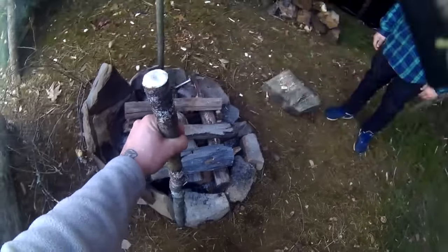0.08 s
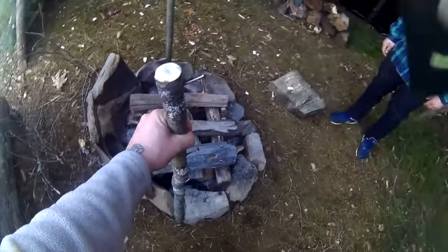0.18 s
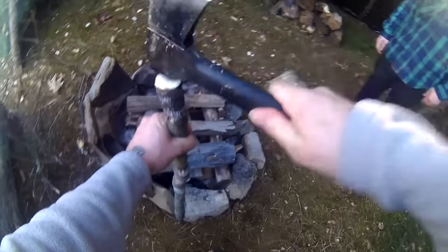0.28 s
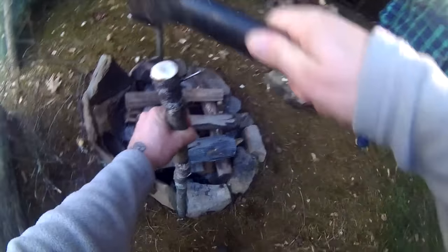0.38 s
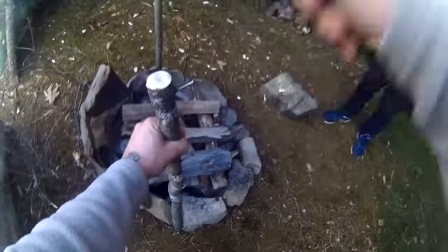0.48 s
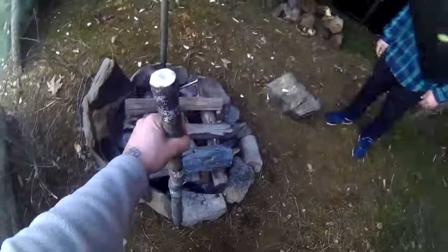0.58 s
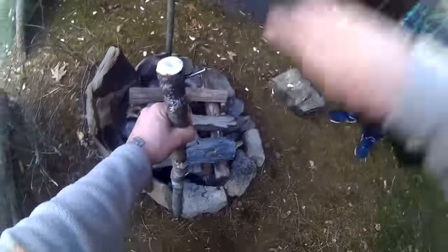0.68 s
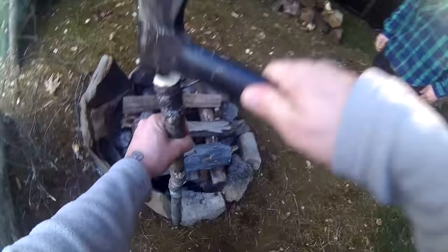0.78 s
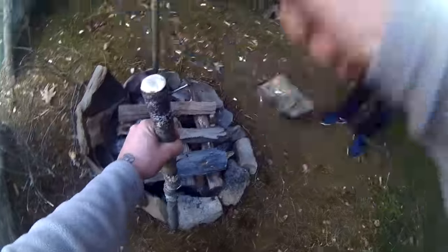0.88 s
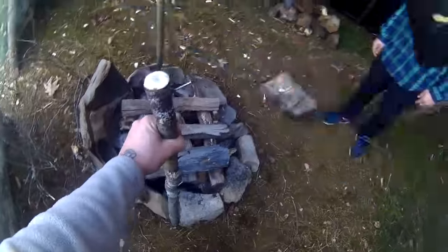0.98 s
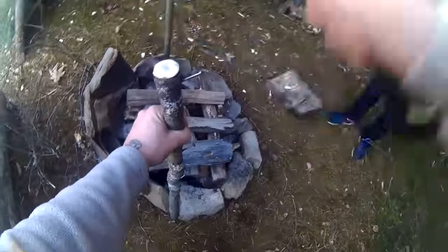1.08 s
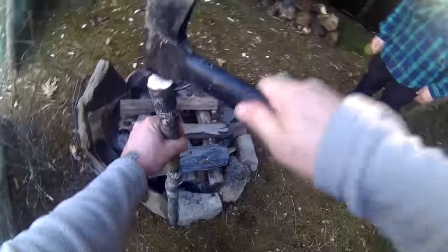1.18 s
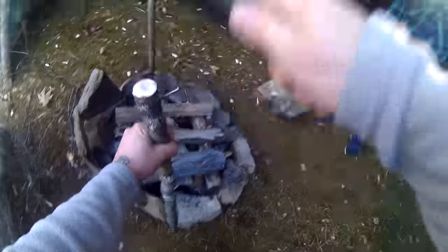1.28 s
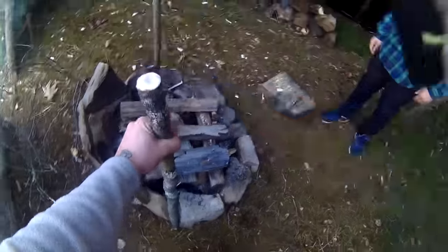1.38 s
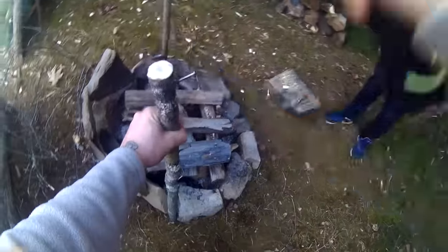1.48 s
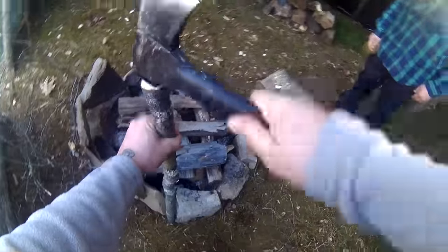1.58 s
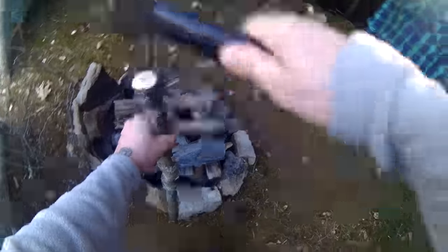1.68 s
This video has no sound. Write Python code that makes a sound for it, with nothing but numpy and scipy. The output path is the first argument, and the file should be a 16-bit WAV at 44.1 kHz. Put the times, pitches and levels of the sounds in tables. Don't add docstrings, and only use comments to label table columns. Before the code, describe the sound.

A hatchet's back knocks a hand-held wooden stake at about 0.23, 0.65, 1.07 and 1.49 seconds. Each blow is a sharp, dry mid-pitched crack with brief steel ring and short outdoor scatter; the first is brightest, the third darkest. Faint soil settling follows, and small mount clicks and thumps come near 1.15 and 1.56. Quiet hiss, low rumble, a thin high whine and barely audible cricket ticks lie beneath.

```python
import sys
import numpy as np
from scipy import signal
from scipy.fft import rfft, irfft
from scipy.io import wavfile

SR = 44100
rng = np.random.default_rng(int(sys.argv[2]) if len(sys.argv) > 2 else 0)


def ratio_of_db(decibels):
    return 10 ** (np.asarray(decibels, float) / 20)


def dump_mix(stems):
    frames = np.atleast_2d(stems).T
    limited = np.clip(frames, -1, 1)
    pcm = np.round(limited * 32767).astype(np.int16)
    wavfile.write(sys.argv[1], SR, pcm)


N = 77175

# frequency in Hz, level in dB per Hz.
HISS = [(88, -10.5), (150, 3), (360, -5), (783, -10.5), (1210, -11.5), (5000, -19.5), (10100, -20.5),
        (16000, -25)]
# frequency in Hz, level in dB per Hz.
MURMUR = [(20, -9), (50, 2.5), (90, 0.5), (150, -8.5), (300, -16), (600, -40.5)]
# frequency in Hz, level in dB per Hz.
RUMBLE = [(4, 4), (8, 2), (20, -4.5), (40, -13), (80, -41.5), (300, -59.5)]
# time in seconds, rumble level in dB.
SWAY = [(0.0, -52.5), (0.024, -52), (0.116, -66.5), (0.438, -50), (0.536, -66.5), (0.848, -50),
        (0.916, -59.5), (1.042, -66.5), (1.198, -52.5), (1.276, -44.5), (1.374, -66.5), (1.422, -54),
        (1.496, -63), (1.578, -54), (1.69, -46.5), (1.75, -64)]
HISS_DB, MURMUR_DB, RUMBLE_DB = -68.5, -67.5, 1
HISS_EDGE_HZ, EDGE_HZ = 15850, 16600

WHINE_HZ, FLIP_HZ, WHINE_DB, LEAK_DB, SIDE_SLOPE = 10020, 38.25, -85.5, -8, .85

# start in seconds, length in seconds, level in dB.
CHIRPS = [(0, .03, -82), (.365, .035, -83), (.952, .035, -82), (1.302, .035, -82), (1.57, .03, -84)]
CRICKET_HZ, CRICKET_WIDTH_HZ = 9200, 610

# start in seconds, strength in dB, brightness in dB per octave,
# crack in dB, snap in dB.
BLOWS = [
    (0.232, -2, 0.5, 3.5, 3.5),
    (0.6466, -3.5, -1, 1.5, 3.5),
    (1.067, -3, -1.5, -0.5, -12.5),
    (1.486, -3, -0.2, -2.5, 2),
]
EARLIER_S, EARLIER_DB = .19, 0
KNOCK_DB, RISE_S, HEAD_RISE_S = -12, .0006, .0003
DETUNE, SPREAD_DB = .003, 1

# frequency in Hz, level in dB, t60 in seconds.
STAKE = [(1139, -1.5, .032), (1343, -1.5, .03), (1494.5, 6, 0.02), (1723, -2.5, 0.041),
         (2055.5, 1.5, 0.021), (2372, 0, 0.015), (2550, -15.5, 0.079), (2692, -6.5, 0.03),
         (2862, -3, 0.032), (3018, -7, 0.025), (3704, -15, .038)]
# frequency in Hz, level in dB, t60 in seconds.
HEAD = [(3875, -18.5, .04), (4360, -4, 0.018), (4716, -11, 0.024), (5250, -23, 0.041), (5640, -12.5, 0.015),
        (6125, -18.5, 0.022), (4620, -19, 0.038), (3374, -21, 0.022)]
# frequency in Hz, level in dB, t60 in seconds.
GRIP = [(330, -31, .035), (550, -31, .028), (750, -31, .025), (920, -25, .03)]
GRIP_TILT, GRIP_SPREAD_DB = 4.6, 1.5
# frequency in Hz, level in dB, t60 in seconds.
FACE = [(7050, -26.5, 0.015), (7700, -24.5, 0.021), (9750, -26, 0.0047), (10193, -28, 0.021),
        (11100, -28, .01)]
# frequency in Hz, level in dB, t60 in seconds.
RINGS = [(1362, -37, .3), (1745, -41, .33), (2406, -38, .11), (2480, -42, .13), (2790, -43, .11),
         (4452, -43, .18), (4517, -45, .18)]
# frequency in Hz, level in dB, t60 in seconds.
THUD = [(55, 3, .09), (190, -4.5, 0.014)]
THUD_DB = -47

CRACK_DB, CRACK_HZ, CRACK_TOP_HZ, CRACK_T60 = -23.5, 5650, 11300, .013
SIZZLE_DB, SIZZLE_T60 = -24.5, 0.045
SNAP_DB, SNAP_HZ, SNAP_T60 = -35, 13800, .007

# frequency in Hz, t60 in seconds.
NEAR = [(500, 0.13), (1500, 0.099), (4000, 0.085), (10000, .08)]
# frequency in Hz, t60 in seconds.
FAR = [(500, .3), (1500, 0.33), (4000, .35), (10000, .15)]
NEAR_DB, NEAR_GAP_S, FAR_DB, FAR_GAP_S = -33.5, 0.02, -43, 0.023
# frequency in Hz, level in dB per Hz.
SLAP = [(300, -29.5), (900, -24), (1400, -3.5), (2600, -2), (3500, -8), (5000, -14.5), (8000, -29),
        (14000, -42)]
SLAP_DB = -40
# delay in seconds, level in dB.
ECHOES = [(0.021, -21.5), (.0275, -25.5), (.1, -52), (.135, -42), (.155, -49), (.19, -45)]
# frequency in Hz, width in Hz, level in dB.
HOLLOWS = [(1260, 87, -5.5), (1660, 160, -1.5), (2260, 130, -14)]

# start in seconds, level in dB.
SETTLES = [
    (.264, -61),
    (.676, -54),
    (1.099, -50.5),
    (1.517, -52),
]
# frequency in Hz, level in dB, t60 in seconds.
SOIL = [(320, 3, 0.023), (560.1, -0.5, .025), (900, -7.5, 0.021)]

# start in seconds, click in dB, thump in dB.
JOLTS = [
    (1.1468, -46.5, -33.5),
    (1.1647, -60, -46),
    (1.5649, -44.5, -33.5),
    (1.5845, -64, -47.5),
]
# frequency in Hz, level in dB, t60 in seconds.
MOUNT = [(1292, 2.5, 0.02), (1570, -3, 0.024), (1870, 3.5, .015), (2300, 1.5, 0.0184)]
MOUNT_RISE_S, THUMP_LAG_S, THUMP_HZ, THUMP_T60 = .0012, .0028, 270, 0.012
SAG_S, SAG_DB = 0.0043, -10.5


def read(points, hz):
    f, value = np.transpose(points)
    return np.interp(np.log(hz + 1), np.log(f + 1), value)


def add(mix, s, sound):
    part = mix[max(round(s * SR), 0):][:len(sound)]
    part += sound[:len(part)]


def band(x, lo_hz, hi_hz):
    return signal.sosfilt(signal.butter(2, [lo_hz, hi_hz], "band", fs=SR, output="sos"), x)


def coloured(spectrum):
    gain = ratio_of_db(read(spectrum, np.fft.rfftfreq(N, 1 / SR)))
    x = irfft(rfft(rng.standard_normal(N)) * gain, N)
    return x / x.std()


def ring(modes, t, rise_s, tilt_db=0., spread_db=SPREAD_DB):
    hz, db, t60 = np.transpose(modes)[:, :, None]
    level_chance, pitch_chance = rng.standard_normal((2, len(modes), 1))
    brightness = tilt_db * np.log2(hz / 1500)
    level = ratio_of_db(db + spread_db * level_chance + brightness - 60 * t / t60)
    sign = (-1.) ** np.arange(len(modes))[:, None]
    waves = sign * level * np.sin(2 * np.pi * hz * (1 + DETUNE * pitch_chance) * t)
    return waves.sum(axis=0) * (1 - np.exp(-t / rise_s))


def background():
    sway = ratio_of_db(RUMBLE_DB + np.interp(np.arange(N) / SR, *np.transpose(SWAY)))
    hiss = ratio_of_db(HISS_DB) * coloured(HISS)
    murmur = ratio_of_db(MURMUR_DB) * coloured(MURMUR)
    x = hiss + murmur + sway * coloured(RUMBLE)
    return signal.sosfilt(signal.ellip(10, .5, 60, HISS_EDGE_HZ, fs=SR, output="sos"), x)


def whine():
    t = np.arange(N) / SR
    flips = sum(np.sin(2 * np.pi * k * FLIP_HZ * t) / k ** SIDE_SLOPE for k in range(1, 13, 2))
    carrier = np.sin(2 * np.pi * WHINE_HZ * t)
    return ratio_of_db(WHINE_DB) * np.sqrt(2) * (2 * flips + ratio_of_db(LEAK_DB)) * carrier


def cricket_chirp(length, db):
    t = np.arange(0, length, 1 / SR)
    noise = rng.standard_normal(len(t))
    x = band(noise, CRICKET_HZ - CRICKET_WIDTH_HZ / 2, CRICKET_HZ + CRICKET_WIDTH_HZ / 2)
    return ratio_of_db(db) * x / x.std() * np.sin(np.pi * t / length) ** 0.13


def scatter(x, decay, gap_s):
    taps = np.zeros(SR // 2)
    at = np.arange(0, SR // 2 - 20, 20)
    at = at + rng.integers(0, 20, len(at))
    taps[at] = rng.choice([-1., 1.], len(at))
    hz, t, z = signal.stft(taps, SR, nperseg=128)
    fade = ratio_of_db(-60 * t / read(decay, hz)[:, None])
    tail = signal.istft(z * fade, SR, nperseg=128)[1]
    tail = tail * np.clip(np.arange(len(tail)) / SR / gap_s, 0, 1) ** 2
    return signal.fftconvolve(x, tail / np.linalg.norm(tail))[:len(x)]


def echoes(x):
    taps = np.zeros(len(x))
    for (s, db), chance in zip(ECHOES, rng.standard_normal(len(ECHOES))):
        taps[round(s * SR)] = ratio_of_db(db + 2 * chance)
    back = signal.fftconvolve(x, taps)[:len(x)]
    return sum(ratio_of_db(db) * signal.lfilter(*signal.iirpeak(hz, hz / width, fs=SR), back)
               for hz, width, db in HOLLOWS)


def steel_crack(t, snap_db):
    grit = rng.standard_normal(len(t))
    fade = ratio_of_db(-60 * t / CRACK_T60) + ratio_of_db(SIZZLE_DB - 60 * t / SIZZLE_T60)
    steep = band(band(grit, CRACK_HZ, CRACK_TOP_HZ), CRACK_HZ, CRACK_TOP_HZ)
    crack = ratio_of_db(CRACK_DB) * fade * steep
    snap = ratio_of_db(SNAP_DB + snap_db - 60 * t / SNAP_T60) * band(grit, SNAP_HZ, EDGE_HZ)
    face = ratio_of_db(KNOCK_DB) * ring(FACE, t, HEAD_RISE_S, spread_db=-1.5)
    return crack + snap + face


def stake_body(t, tilt_db):
    body = ring(STAKE, t, RISE_S, tilt_db) + ring(HEAD, t, HEAD_RISE_S, tilt_db)
    return body - ring(GRIP, t, RISE_S, GRIP_TILT * tilt_db, spread_db=GRIP_SPREAD_DB)


def slap_back(t, db):
    click = irfft(ratio_of_db(read(SLAP, np.fft.rfftfreq(len(t), 1 / SR))), len(t))
    click = np.roll(click / np.linalg.norm(click), 100) * 10
    return scatter(ratio_of_db(db + SLAP_DB) * click, NEAR, NEAR_GAP_S)


def knock(db, tilt_db, crack_db, snap_db):
    t = np.arange(SR // 2) / SR
    crack = ratio_of_db(db + crack_db) * steel_crack(t, snap_db)
    direct = ratio_of_db(db + KNOCK_DB) * stake_body(t, tilt_db) + crack
    near = ratio_of_db(NEAR_DB) * scatter(direct, NEAR, NEAR_GAP_S)
    far = ratio_of_db(FAR_DB) * scatter(direct, FAR, FAR_GAP_S)
    wet = near + far + echoes(direct) + slap_back(t, db)
    rings = ratio_of_db(db + KNOCK_DB) * ring(RINGS, t, RISE_S)
    thud = ratio_of_db(db + THUD_DB) * ring(THUD, t, RISE_S, spread_db=1.5)
    return direct + wet + rings + thud


def settle(db):
    t = np.arange(SR // 10) / SR
    return ratio_of_db(db) * ring(SOIL, t, MOUNT_RISE_S, spread_db=3.5)


def mount_jolt(click_db, thump_db):
    t = np.arange(SR // 10) / SR
    late = np.maximum(t - THUMP_LAG_S, 0)
    click = ring(MOUNT, t, MOUNT_RISE_S, spread_db=4.5)
    push = np.sin(2 * np.pi * THUMP_HZ * late) * ratio_of_db(-60 * late / THUMP_T60)
    sag = ratio_of_db(SAG_DB) * (late / SAG_S) ** 2 * np.exp(2 - 2 * late / SAG_S)
    return ratio_of_db(click_db) * click + ratio_of_db(thump_db) * (push - sag)


def scene():
    mix = background() + whine()
    for s, length, db in CHIRPS:
        add(mix, s, cricket_chirp(length, db))
    add(mix, 0, knock(EARLIER_DB, 0, 0, 0)[round(EARLIER_S * SR):])
    for s, *strike in BLOWS:
        add(mix, s, knock(*strike))
    for s, db in SETTLES:
        add(mix, s, settle(db))
    for s, click_db, thump_db in JOLTS:
        add(mix, s, -mount_jolt(click_db, thump_db))
    return -mix[None]


def band_limit(x):
    return signal.sosfilt(signal.butter(12, 16880, fs=SR, output="sos"), x)


def record(dry):
    lowpass = signal.firwin(255, EDGE_HZ, window=("kaiser", 8), fs=SR)
    limited = signal.oaconvolve(dry, lowpass[None], "same")
    return band_limit(limited)


dry = scene()
out = record(dry)
dump_mix(out)
```